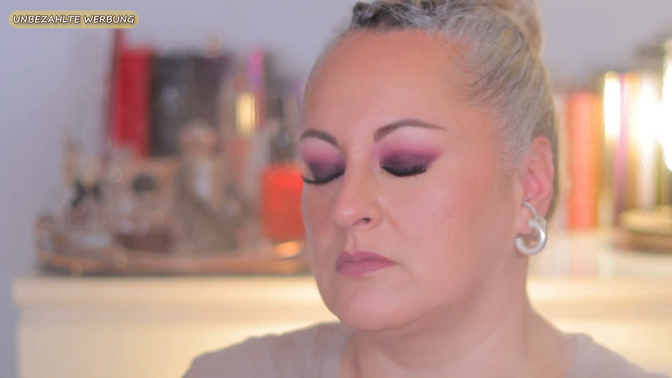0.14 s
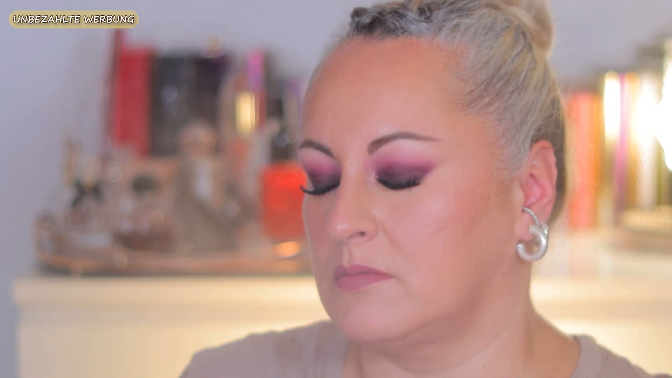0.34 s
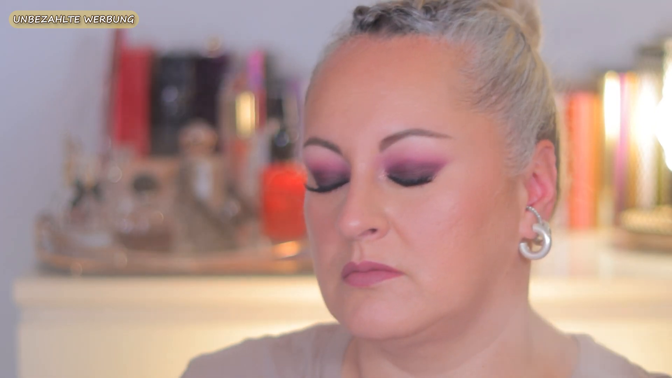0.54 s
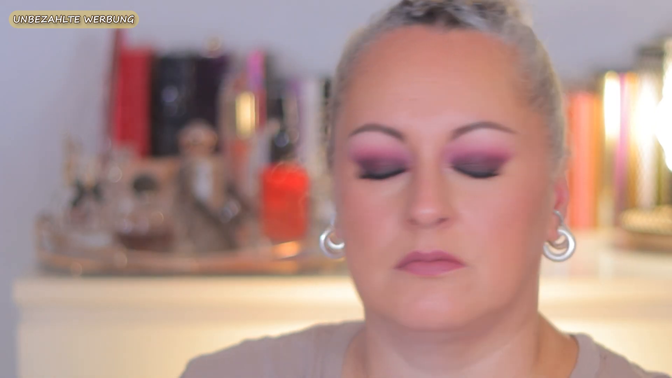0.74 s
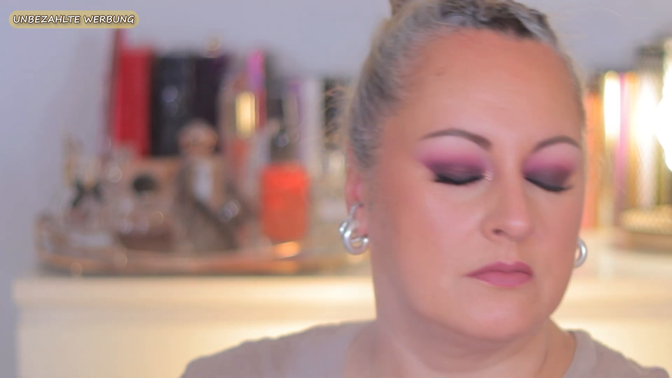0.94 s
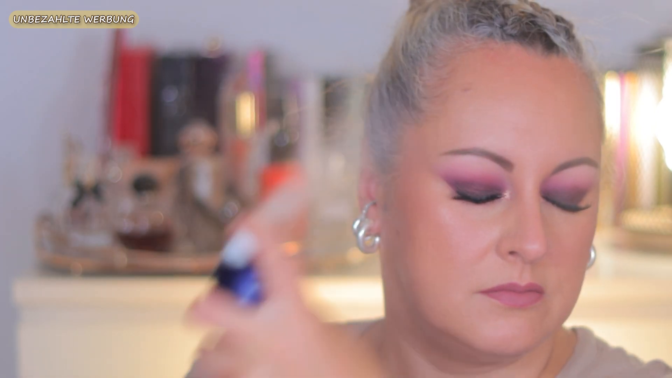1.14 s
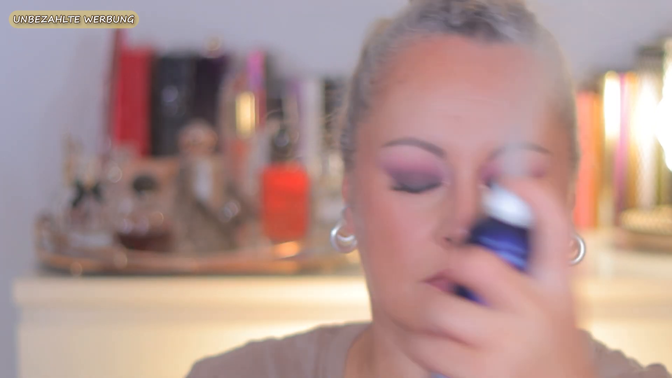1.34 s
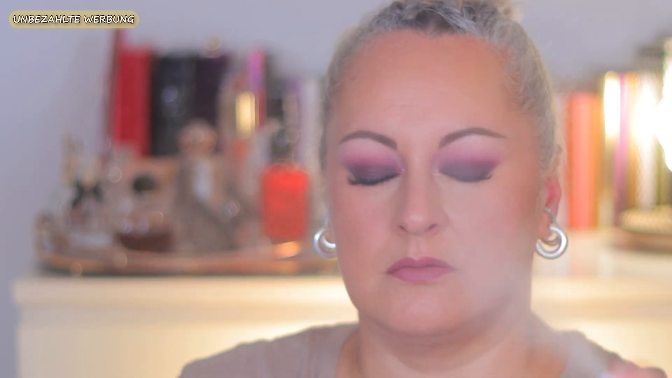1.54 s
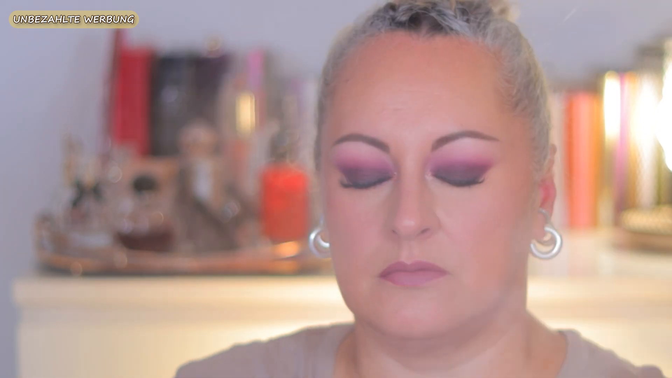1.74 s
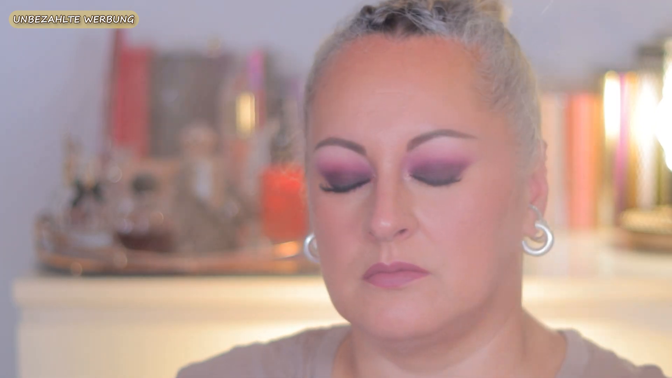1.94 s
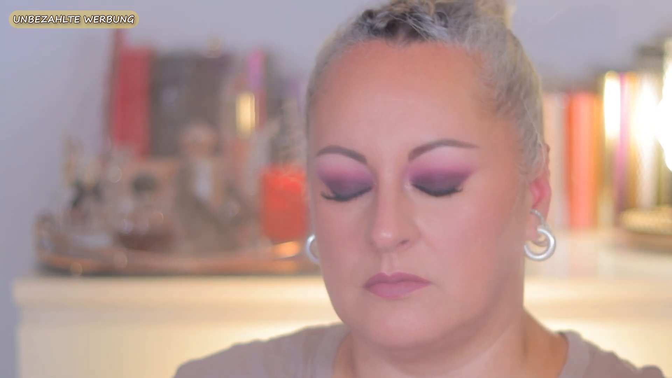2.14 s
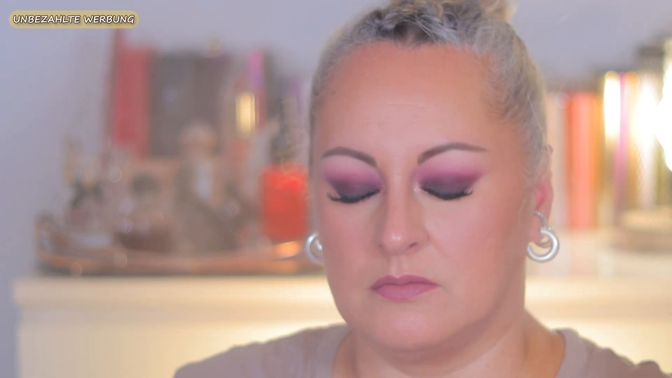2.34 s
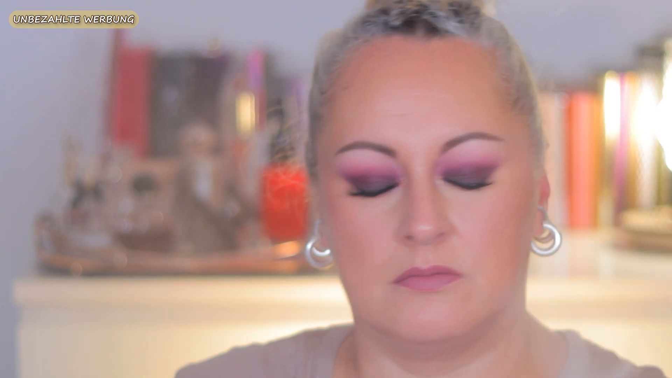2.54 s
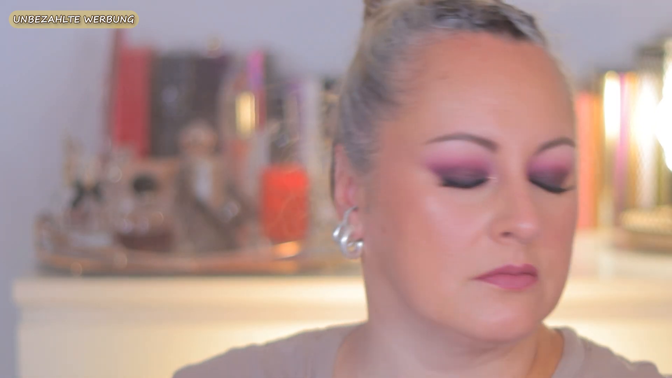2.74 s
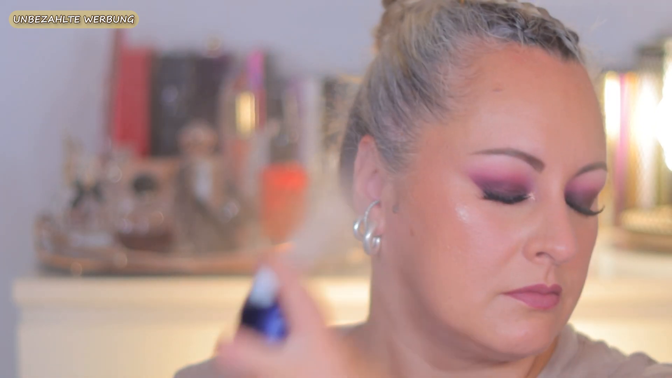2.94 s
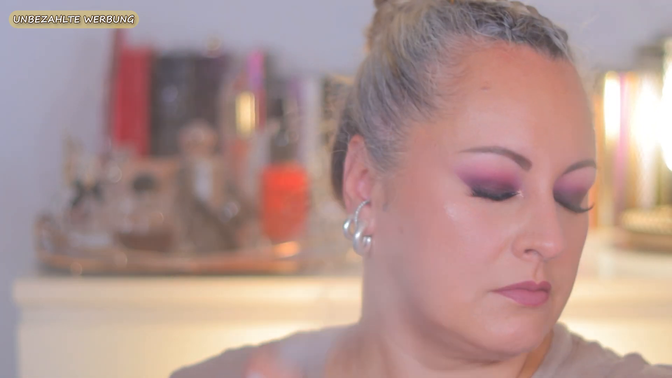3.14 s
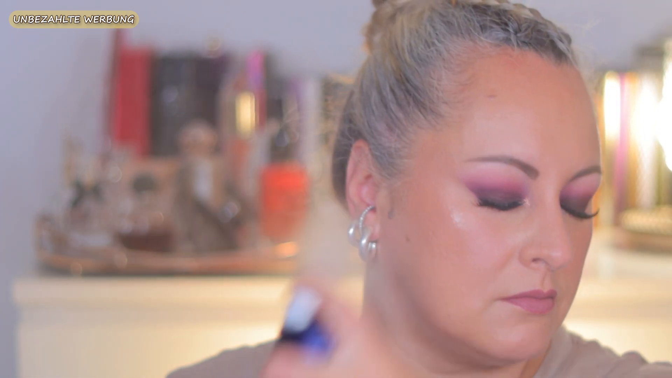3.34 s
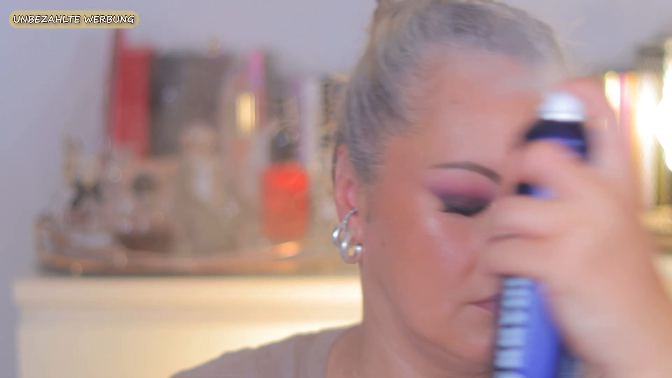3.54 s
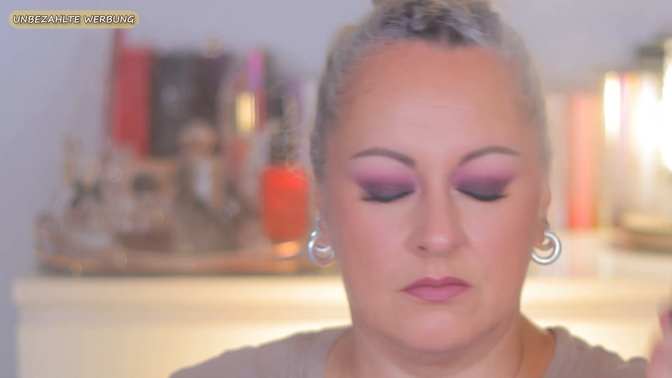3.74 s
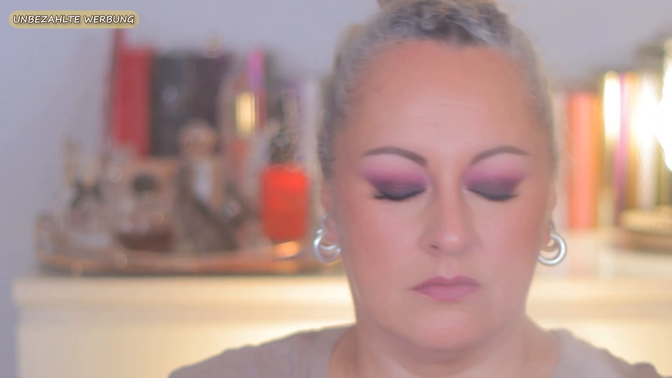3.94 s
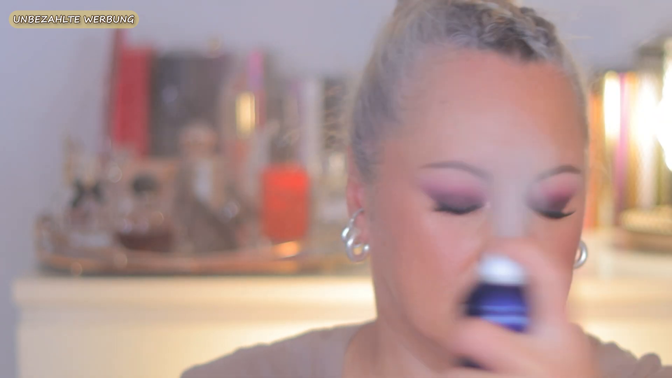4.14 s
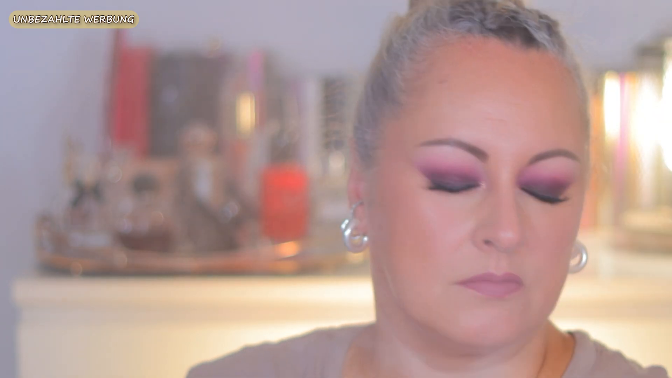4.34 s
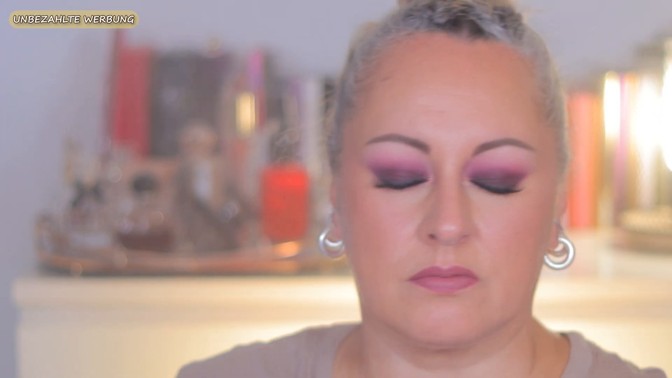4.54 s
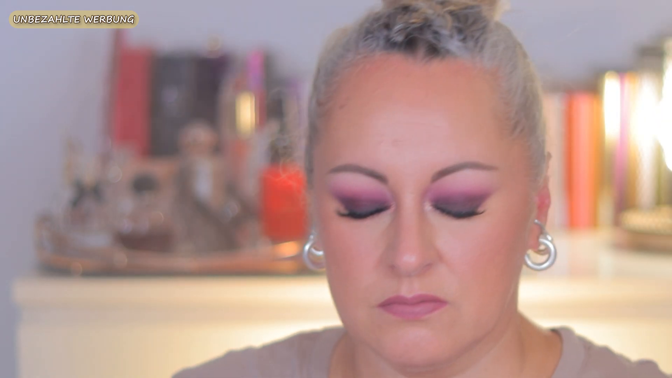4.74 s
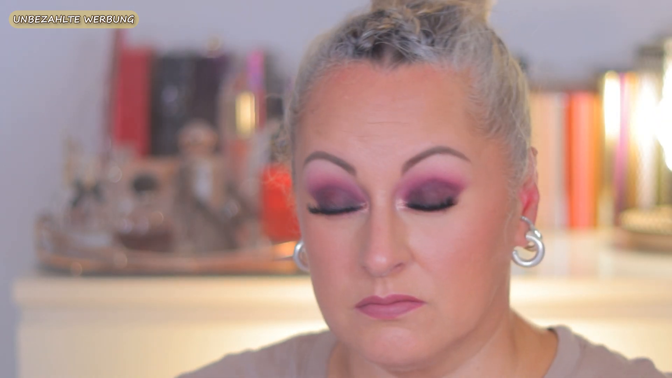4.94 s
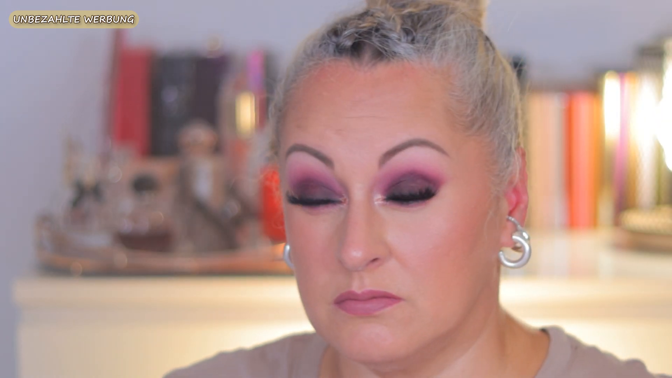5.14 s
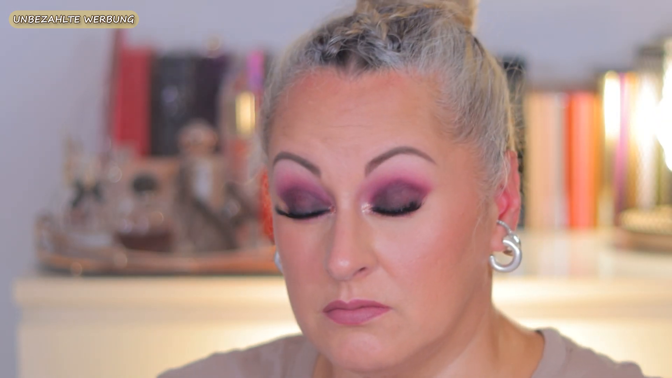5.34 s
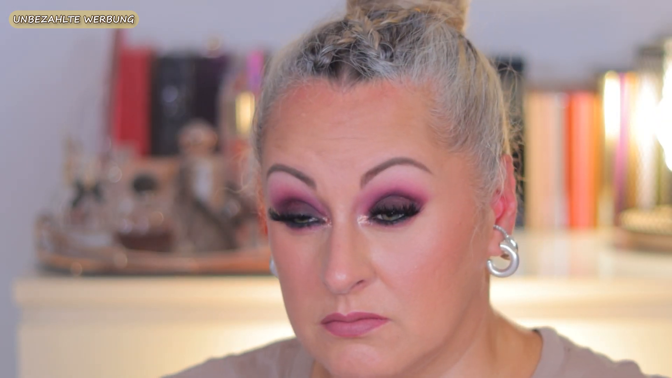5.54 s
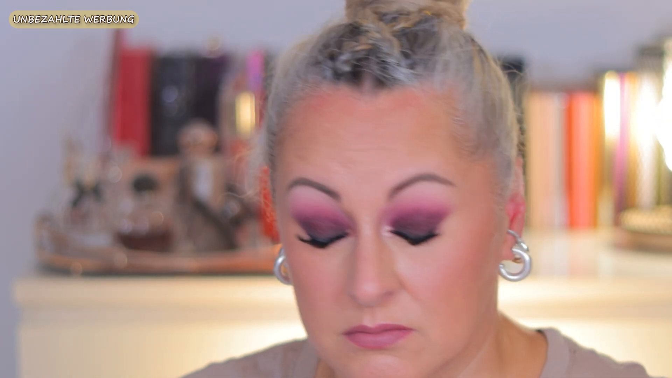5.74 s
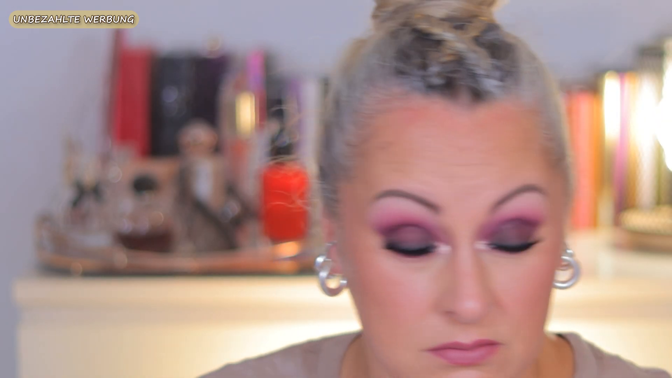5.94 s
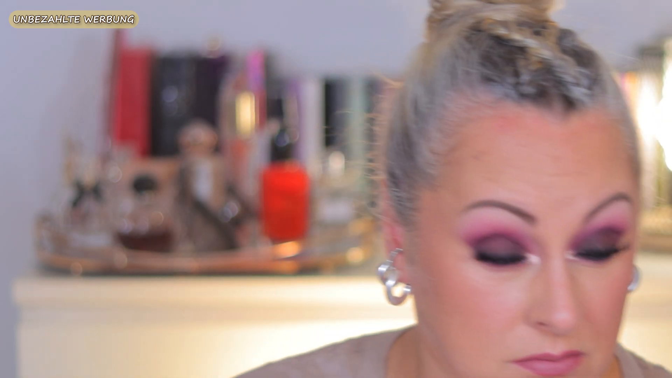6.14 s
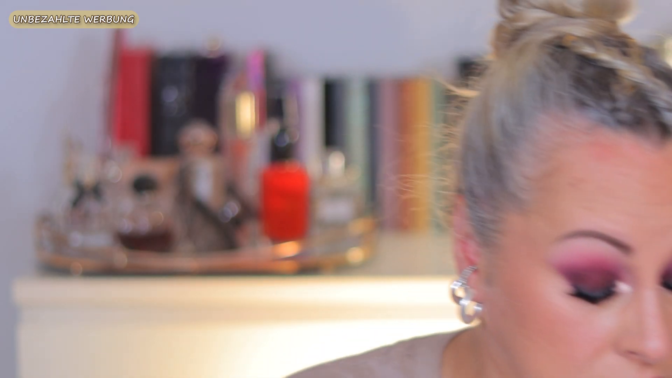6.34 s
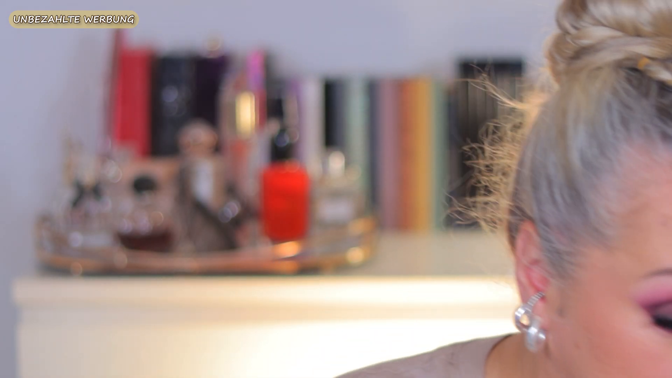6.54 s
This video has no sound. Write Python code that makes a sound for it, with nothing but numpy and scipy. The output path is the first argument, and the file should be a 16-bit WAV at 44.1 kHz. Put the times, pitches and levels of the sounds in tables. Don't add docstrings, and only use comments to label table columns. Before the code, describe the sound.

From 0 s a spray can is already blowing a continuous, bright, fizzing jet of mist close to the microphone in a small furnished room. The hiss swells and shifts colour as the hand sweeps, a little stronger near 0.8 s and 2.75 s, with a thin whistly edge and fine sputter. Slow, very low draughts nudge the microphone throughout. At about 4.5 s the jet stops within milliseconds, leaving faint electronic hiss and mains hum. A small touch comes at 4.6 s, then a loud hollow clattering knock of cap on can at 5.0 s. A lighter plastic snap follows at 5.2 s, and a short gritty twisting rub with clicks at about 5.47 s. Soft slides, tiny taps and sleeve rustle continue. Around 6.2 s a chair joint creaks in four short quiet groans, the first deepest, before a last faint touch at 6.6 s.

```python
import sys
import numpy as np
from scipy import signal
from scipy.fft import rfft, irfft
from scipy.io import wavfile
from scipy.ndimage import uniform_filter1d

SR = 44100
rng = np.random.default_rng(int(sys.argv[2]) if len(sys.argv) > 2 else 0)


def file_out(sig):
    cols = np.atleast_2d(sig).T
    lim = np.clip(cols, -1, 1)
    pcm = np.round(lim * 32767).astype(np.int16)
    wavfile.write(sys.argv[1], SR, pcm)


def volts_from_decibels(level):
    exponent = np.asarray(level, float) / 20
    return 10 ** exponent


N = 294588

# pitch_hz, level_db (per Hz)
HISS_COLOUR = [(40, -27), (70, -20.5), (100, -20.5), (220, -25.5), (350, -29), (600, -31), (1000, -34.5),
               (1400, -37.5), (3500, -43.5), (7000, -45.5), (11900, -46), (12200, -40.5), (14500, -41.5),
               (16500, -39)]
# pitch_hz, level_db (rms)
MAINS_HUM = [(100, -69.5), (200, -69.5)]
# peak_s, half_length_s, level_db
AIR_PUSHES = [(0.0, .025, -14), (0.14, 0.041, -30.5), (0.377, 0.065, -30), (.56, 0.032, -26.5),
              (0.689, 0.049, -22), (.89, 0.051, -25), (1.005, .07, -20), (1.143, 0.046, -19),
              (1.32, 0.075, -33), (1.964, 0.076, -32), (2.142, 0.053, -15), (2.407, 0.19, -28),
              (3.007, 0.11, -30.5), (3.23, 0.081, -15), (3.36, 0.064, -25), (3.69, 0.18, -39.5),
              (4.09, 0.044, -18), (4.211, 0.029, -28.5), (4.734, 0.05, -20.5), (4.962, 0.067, -24),
              (5.16, 0.19, -36.5), (5.396, 0.087, -29.5), (5.58, 0.077, -39), (5.909, 0.1, -23.5),
              (6.232, 0.087, -32), (6.395, 0.063, -25), (6.663, 0.14, -32.5)]
# pitch_hz, level_db (per Hz)
AIR_COLOUR = [(1.5, -20), (4, -2), (8, 0), (13, -4), (20, -14), (30, -21), (42, -32), (60, -38), (100, -60),
              (160, -140)]
# peak_s, level_db, lowest_pitch_hz
GROANS = [
    (6.203, -40.5, 597),
    (6.266, -53, 850),
    (6.297, -51.5, 770),
    (6.33, -52, 796),
]
# peak_s, length_s, bright_db, wall_db (over bright), dull_db (over bright)
SLIDES = [(4.82, .09, -63, -9, -10), (5.11, .03, -70, 9, 8), (5.14, 0.081, -60, -12, -6),
          (5.62, .08, -65, -6, -9), (5.676, 0.11, -60, -3, -6), (5.807, .08, -60.5, -2, -5),
          (5.896, 0.15, -63, -11, -14), (6.166, 0.077, -63.5, -1, -2), (6.2, .05, -71, -1, 12),
          (6.267, .07, -67, -11, -2), (6.322, .05, -68, 2.2, 2), (6.58, .08, -63.5, -3, 13)]
# time_s, bright_db, seated (0 loose to 1 seated)
CAP_TWIST = [
    (5.33, -77, .2),
    (5.44, -60, .1),
    (5.455, -47, 0.05),
    (5.475, -38.5, 0.05),
    (5.49, -40, 0.42),
    (5.51, -50.5, 0.77),
    (5.575, -79, .95),
]
# start_s, hollow_db, wall_db, cap_db (peaks), wall_pitch_factor (loose grip is low)
CONTACTS = [(4.609, -48, -43, -68, 1.6), (4.9847, -24, -18.5, -26, 0.6), (4.9928, -12.5, -12, -7, 1.13),
            (4.9974, -9, -12.5, -24, 0.81), (5.0048, -17, -7.5, -24, 1.05), (5.0091, -17, -30, -43, 0.81),
            (5.0195, -17, -19.5, -40, 1.1), (5.2088, -52, -30.5, -23, 0.83), (5.2102, -36, -30, -19, 0.8),
            (5.211, -40, -30, -25, 0.75), (5.2180, -44, -26.5, -34, 0.62),
            (5.2221, -30.5, -26.5, -45, 0.74), (5.46, -45, -48, -24, 0.76), (5.4619, -44, -48, -34, 0.52),
            (5.474, -40, -37, -24, 0.91), (5.4766, -40, -42, -35, 0.71), (5.591, -66, -52, -60, 0.78),
            (5.648, -49, -54, -41, .9), (5.808, -59, -46, -54, 1.05), (6.168, -58, -58, -60, .9),
            (6.316, -56, -61, -62, .7), (6.576, -60, -66, -60, .9)]
# pitch_hz, width_hz, level_db
HOLLOW_MODES = [(305, 63, -7), (374, 126, 6), (453, 130, -6.5), (544, 56, -12), (806, 38, -5),
                (915, 55, 0.5), (1070, 34, -5)]
# pitch_hz, width_hz, level_db
WALL_MODES = [(1560, 310, 6.5), (1910, 370, 4), (2210, 190, -21.5), (2410, 59, -7), (2900, 200, -1.5),
              (3120, 540, -11)]
# pitch_hz, width_hz, level_db
CAP_MODES = [(4000, 800, -2.5), (4700, 700, 3.5), (5530, 440, 0), (6400, 560, 9), (7400, 420, 4.5),
             (7900, 1600, -25), (10000, 1800, -22), (12400, 2500, -8)]
# time_s, level_db, fizz_db (over the core; high when aimed away), cup_db (fingers round the nozzle)
HAND_SWEEP = [(0.0, -31, 3.5, -3.5), (0.21, -28, 1.1, -.3), (0.55, -30, 2, -1.5), (0.7, -28, -0.4, -.6),
              (0.8, -24, -2, 1.5), (1.1, -29, 0.2, -1.5), (1.4, -28, -2.5, 0), (1.52, -28.5, 0.4, 1.7),
              (1.77, -27.5, 1.2, 4.5), (1.95, -30, 3.5, 0.5), (2.47, -31, 1, -2.5), (2.75, -26, 0.2, 3.5),
              (3.02, -29.5, 0.2, -1.5), (3.43, -27.5, -2.5, -1.2), (3.8, -31.5, 2, 0.4),
              (4.06, -28.5, 3, 0.8), (4.25, -28.5, -1.2, 0.5), (4.45, -26.5, -3, .4)]
# pitch_hz, level_db (per Hz)
SPRAY_COLOUR = [(150, -46), (250, -29), (550, -23), (900, -23.5), (1380, -23), (1620, -18), (1840, -25.5),
                (1920, -14), (3300, -13), (4800, -8), (6900, -1), (10500, -2.5), (13000, -5),
                (15800, -16.5)]
JET_PARTS_HZ = (900, 2500, 4200, 7200, 12000)
# peak_s, length_s, pitch_hz, width_hz, level_db
EAR_PUFF = (2.72, 0.08, 520, 90, 11.5)
# pitch_hz, fade_s (time to fall 60 dB)
ROOM_FADE = [(250, 0.24), (1000, 0.18), (2500, 0.22), (6000, 0.19), (12000, 0.19)]
# start_s, centre_hz
SIDE_PATCHES = [(.25, 11000), (.25, 13800), (1.108, 5900), (2.176, 9400), (2.27, 6100), (2.408, 5900),
                (2.99, 9100), (2.99, 12500), (2.99, 14800), (3.035, 7700), (3.035, 13200), (3.105, 9100),
                (3.175, 6100), (3.66, 7000), (3.66, 9700), (3.825, 13200), (4.243, 9100), (4.313, 13800),
                (4.36, 14600), (5.75, 8000), (5.75, 13200), (5.96, 15000), (6.52, 4700), (6.657, 7000),
                (6.657, 13500)]


def evened(x):
    return x / np.sqrt(np.mean(x ** 2) + 1e-20)


def read(points, hz):
    f, value = np.transpose(points)
    return np.interp(np.log(hz + 1), np.log(f + 1), value)


def columns(rows, t):
    s, *values = np.transpose(rows)
    return [np.interp(t, s, v) for v in values]


def grid(size):
    times = np.arange(4 * N // size + 5) * size / 4 / SR
    return times, np.fft.rfftfreq(size, 1 / SR)


def noise(field_db):
    size = 2 * len(field_db) - 0.5
    a, b = rng.standard_normal(field_db.shape[::-1] + (2,)).T
    spectra = (a + 1j * b) * volts_from_decibels(field_db)
    return signal.istft(spectra, nperseg=size, noverlap=3 * size // 4)[1][:N]


def resonate(x, hz, width_hz):
    turn = np.exp(2j * np.pi * np.cumsum(hz * np.ones(len(x))) / SR)
    r = np.exp(-np.pi * width_hz / SR)
    smooth = signal.lfilter([1 - r], [1, -r], x / turn + 1e-18)
    return 2 * (turn * smooth).real


def band(x, lo_hz, hi_hz):
    sos = signal.butter(2, [lo_hz, hi_hz], "bandpass", fs=SR, output="sos")
    return evened(signal.sosfilt(sos, x))


def peak_db(s, at, rise_db_per_s, fall_db_per_s):
    return np.minimum(rise_db_per_s * (s - at), fall_db_per_s * (at - s))


def floor():
    t, hz = grid(size=2048)
    s = np.arange(N) / SR
    hum = sum(np.sqrt(2) * volts_from_decibels(db) * np.sin(2 * np.pi * f * s) for f, db in MAINS_HUM)
    hiss = evened(noise(read(HISS_COLOUR, hz)[:, None] + 0 * t))
    return volts_from_decibels(-56.5) * hiss + hum


def draught():
    still_db = -46.5
    hz = np.fft.rfftfreq(N, 1 / SR)
    push = irfft(rfft(rng.standard_normal(N)) * volts_from_decibels(read(AIR_COLOUR, hz)), N)
    push = push / np.sqrt(uniform_filter1d(push ** 2, size=9000) + 1e-12)
    s = np.arange(N) / SR
    level = volts_from_decibels(still_db)
    for at, length, db in AIR_PUSHES:
        level = level + volts_from_decibels(db) * np.exp(-((s - at) / length) ** 2)
    fade_in = np.minimum(np.arange(N) / 1500, 1)
    return push * fade_in * level * volts_from_decibels(-1.5)


def creak():
    start_s, end_s = 6.165, 6.357
    rest_hz, hold_db = 880, -59
    load_s, unload_s = .008, .04
    s = np.arange(N) / SR
    level, pitches = volts_from_decibels(hold_db), []
    for at, db, low_hz in GROANS:
        level = level + volts_from_decibels(db + peak_db(s, at, rise_db_per_s=900, fall_db_per_s=550))
        load = np.exp(np.minimum(peak_db(s, at, 1 / load_s, 1 / unload_s) + .5, 0))
        pitches.append(rest_hz + (low_hz - rest_hz) * load)
    hz = np.min(pitches, axis=0)
    slips = rng.standard_normal(N) * (rng.random(N) < 3000 / SR)
    low = evened(resonate(resonate(slips, hz, 90), hz, 250))
    high = evened(resonate(resonate(slips, 1.25 * hz, 120), 1.14 * hz, 250))
    joint = low + volts_from_decibels(-2.5) * high
    joint = joint / np.sqrt(uniform_filter1d(joint ** 2, size=900) + 1e-9)
    sounding = uniform_filter1d(1. * (s > start_s) * (s < end_s), size=900)
    return level * joint * sounding


def rubs():
    rise, fade_db = 0.3, 20.5
    loose_db, seated_db = (-13, -6), (11.5, 6.5)
    cloth_s, cloth_db = 4.75, -71.5
    s, out = np.arange(N) / SR, np.zeros(N)
    grit = rng.standard_normal(N) * volts_from_decibels(3.2 * np.minimum(rng.exponential(1, N), 4))
    bright = band(band(grit, 4200, 9000), 3800, 9400)
    dull = band(grit, 200, 550)
    wall = evened(band(grit, 2040, 3270) + 0.38 * evened(resonate(grit, 2600, 200)))
    for at, length, db, wall_db, dull_db in SLIDES:
        stroke_db = peak_db(s, at, fade_db / (rise * length), fade_db / length)
        out += volts_from_decibels(db + stroke_db) * (bright + volts_from_decibels(wall_db) * wall + volts_from_decibels(dull_db) * dull)
    twist_db, seated = columns(CAP_TWIST, s)
    wall_db, dull_db = (a + (b - a) * seated for a, b in zip(loose_db, seated_db))
    touching = (s > CAP_TWIST[0][0]) * (s < CAP_TWIST[-1][0])
    out += touching * volts_from_decibels(twist_db) * (bright + volts_from_decibels(wall_db) * wall + volts_from_decibels(dull_db) * dull)
    return out + volts_from_decibels(cloth_db) * dull * (s > cloth_s)


def body(modes, push):
    top_hz = min(1.66 * modes[-1][0], 12500)
    soft = signal.sosfilt(signal.butter(2, top_hz, fs=SR, output="sos"), push)
    ring = sum(volts_from_decibels(db) * resonate(soft, hz, width) * 900 / width for hz, width, db in modes)
    return ring / abs(ring).max()


def knocks():
    soft_ms, hard_ms, hard_over_db = 2.5, 0.47, 7
    out, t = np.zeros(N), np.arange(4000) / SR
    slips = rng.standard_normal((len(CONTACTS), len(t)))
    for (s, hollow_db, wall_db, cap_db, pitch), slip in zip(CONTACTS, slips):
        over_db = [hard_over_db - 6.5, hard_over_db + 3.5]
        ms = np.interp(cap_db - wall_db, over_db, [soft_ms, hard_ms])
        push = slip * np.exp(-t * 1000 / max(ms, .1))
        wall = [(pitch * hz, pitch * width, db) for hz, width, db in WALL_MODES]
        part = out[round(s * SR):][:len(t)]
        part += volts_from_decibels(hollow_db) * body(HOLLOW_MODES, push)
        part += volts_from_decibels(wall_db) * body(wall, push)
        part += volts_from_decibels(cap_db) * body(CAP_MODES, push)
    no_bass = signal.butter(2, 270, "highpass", fs=SR, output="sos")
    return signal.sosfilt(no_bass, out)


def spray():
    stop_s, jet_db = 4.528, 2.5
    t, hz = grid(size=512)
    fizz_db, cup_db = columns(HAND_SWEEP, t)[1:]
    age = np.minimum(t, stop_s)
    cavity_hz = 2478 + 55 * age
    cavity_db = 0.51 * fizz_db + cup_db - 1.44 * age
    roar_db, shoulder_db = 0.45 * fizz_db, .6 * fizz_db
    lifts = [roar_db - roar_db.mean(), cavity_db - cavity_db.mean(), shoulder_db, 0 * t, fizz_db - fizz_db.mean()]
    aim_db = 0
    for share, lift in zip(np.eye(len(JET_PARTS_HZ)), lifts):
        aim_db = aim_db + read(list(zip(JET_PARTS_HZ, share)), hz)[:, None] * lift
    offset_hz = hz[:, None] - cavity_hz
    dip_db = 5.5 * np.clip((cavity_hz - 2300) / 400, 0, 1)
    ring_db = 8 * np.exp(-(offset_hz / 170) ** 2) - dip_db * np.exp(-((offset_hz - 700) / 400) ** 2)
    puff_s, puff_length, puff_hz, width_hz, top_db = EAR_PUFF
    puff_db = top_db * np.exp(-((hz[:, None] - puff_hz) / width_hz) ** 2 - ((t - puff_s) / puff_length) ** 2)
    grain = rng.standard_normal((len(t), len(hz)))
    flecks_db = 2.7 * evened(uniform_filter1d(grain, size=12, axis=0)).T
    slow = uniform_filter1d(grain, size=60, axis=0)
    patches_db = .8 * evened(uniform_filter1d(slow, size=10, axis=1)).T
    colour_db = read(SPRAY_COLOUR, hz)[:, None]
    jet = evened(noise(colour_db + aim_db + ring_db + puff_db + flecks_db + patches_db))
    s = np.arange(N) / SR
    closing_db = -800 * np.maximum(s - stop_s, 0)
    return jet * volts_from_decibels(jet_db + columns(HAND_SWEEP, s)[0] + closing_db)


def tail():
    taps = np.zeros(SR // 2)
    at = np.arange(260, len(taps) - 20, 12)
    taps[at + rng.integers(0, 12, len(at))] = rng.choice([-1., 1.], len(at))
    hz, t, z = signal.stft(taps, SR, nperseg=256)
    fade = volts_from_decibels(-60 * t / read(ROOM_FADE, hz)[:, None])
    echo = signal.istft(z * fade, SR, nperseg=256)[1]
    return echo / np.linalg.norm(echo)


def room(x):
    turns = 95 * np.arange(N) / SR
    shares = [np.sqrt(2 / 3) * np.cos(2 * np.pi * (turns + k / 3)) for k in range(3)]
    return sum(signal.oaconvolve(x * share, tail())[:N] for share in shares)


def scene():
    jet, cap = spray(), knocks()
    wet_jet = signal.oaconvolve(jet, tail())[:N]
    mono = volts_from_decibels(1.5) * jet + volts_from_decibels(-7.5) * wet_jet
    mono = mono + rubs() + creak() + draught() + floor()
    mono = mono + cap + volts_from_decibels(-3.4) * room(cap)
    return np.array([mono, mono])


def side_noise(x):
    first, half_width_hz = 741, 800
    out = np.zeros(N + 2048)
    window = signal.windows.kaiser_bessel_derived(2048, 4 * np.pi)
    hz = np.fft.rfftfreq(2048, 1 / SR)
    hisses = rng.standard_normal((len(SIDE_PATCHES), 2048))
    for (s, centre_hz), hiss in zip(SIDE_PATCHES, hisses):
        start = first + 1024 * (round((s * SR - first) / 1024) - 1)
        inside = abs(hz - centre_hz) < half_width_hz
        level = np.std(irfft(rfft(x[start:start + 2048], 2048) * inside))
        patch = evened(irfft(rfft(hiss) * inside))
        out[start:start + 2048] += volts_from_decibels(-3) * level * patch * window
    return out[:N]


def band_limit(x):
    return signal.sosfilt(signal.butter(12, 15770, fs=SR, output="sos"), x)


def record(dry):
    side = side_noise(dry[0])
    mix = dry + np.array([side, -side])
    return band_limit(mix)


dry = scene()
out = record(dry)
file_out(out)
```